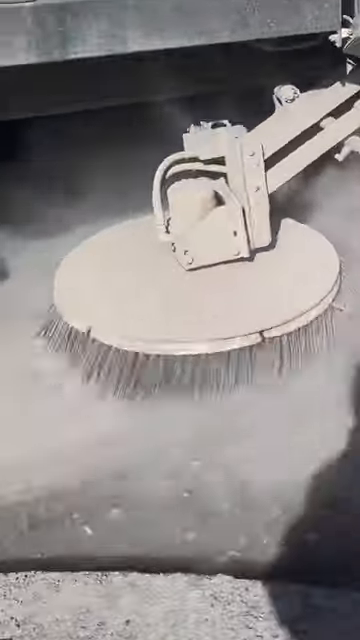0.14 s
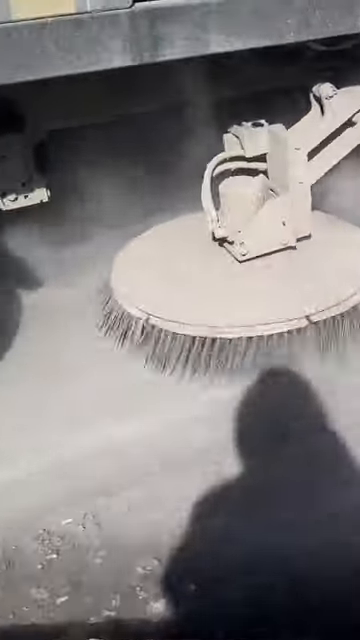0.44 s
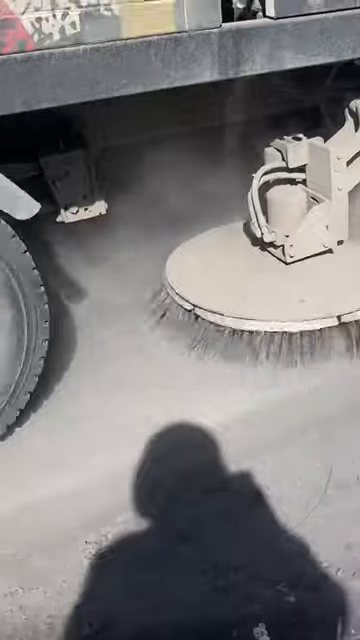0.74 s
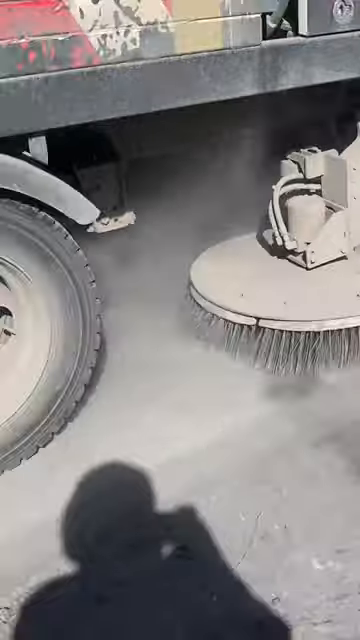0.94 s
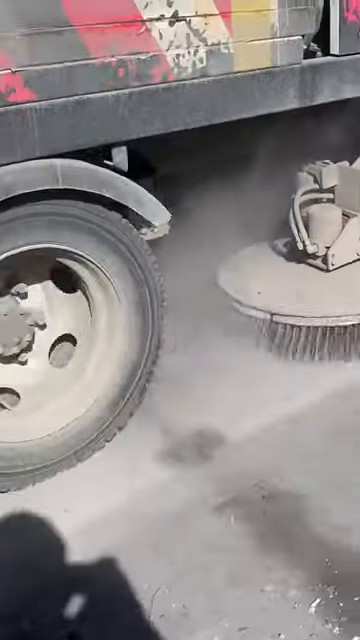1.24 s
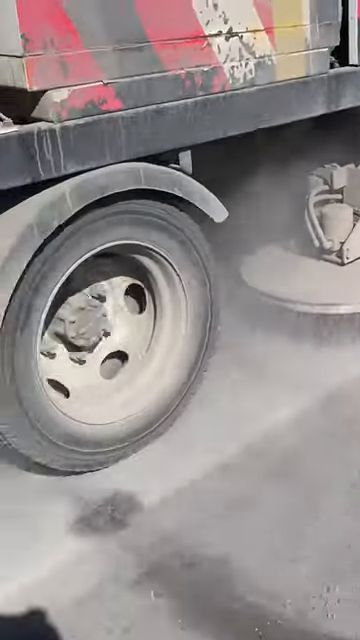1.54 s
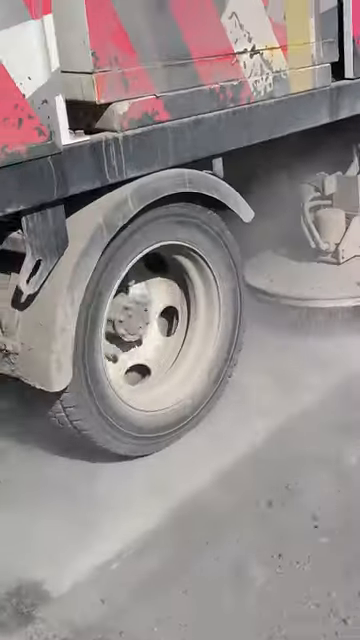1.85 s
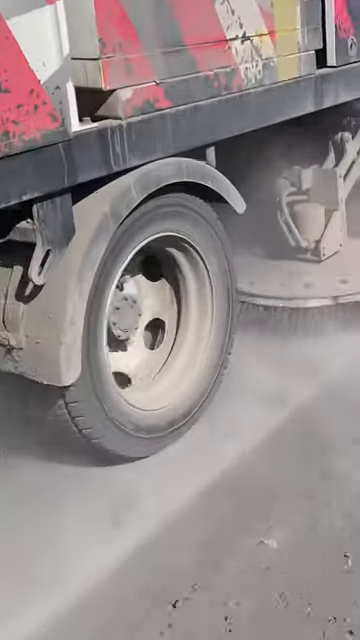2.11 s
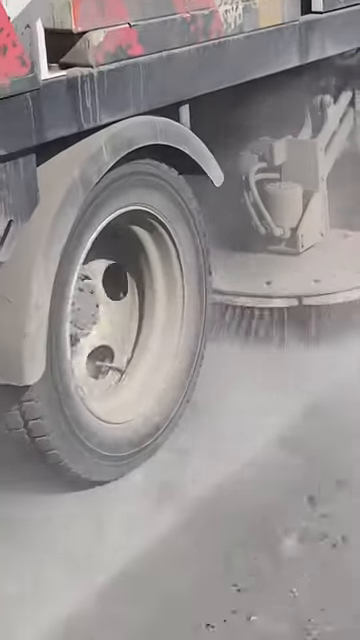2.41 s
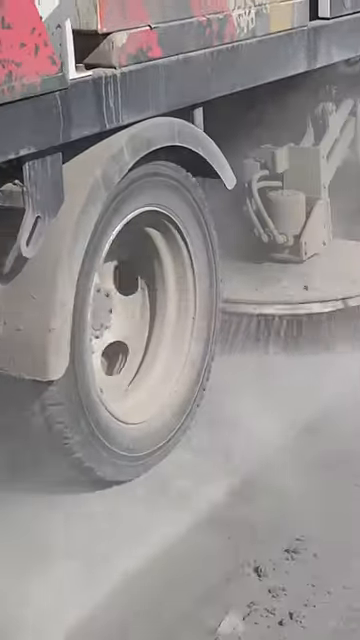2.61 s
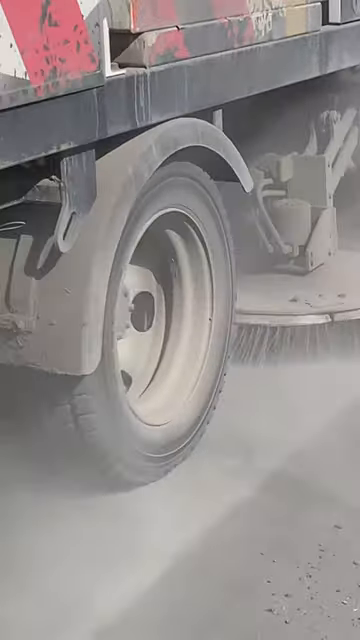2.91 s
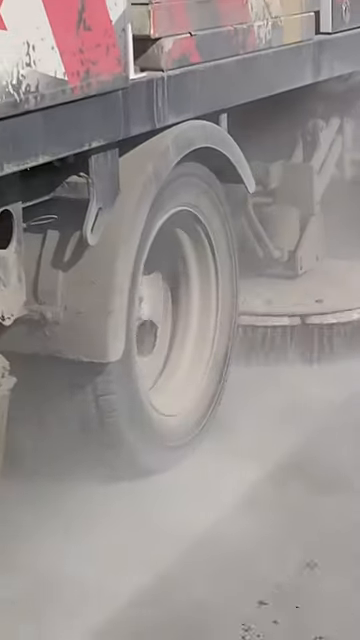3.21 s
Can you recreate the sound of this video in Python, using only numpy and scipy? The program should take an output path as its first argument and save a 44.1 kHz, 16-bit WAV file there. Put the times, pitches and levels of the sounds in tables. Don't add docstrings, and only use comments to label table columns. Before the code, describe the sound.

A street sweeper truck roars steadily, brush rasping on asphalt, bright air hiss slowly fading.

```python
import sys
import numpy as np
from scipy import signal
from scipy.fft import rfft, irfft
from scipy.io import wavfile
from scipy.ndimage import uniform_filter1d

SR = 44100
rng = np.random.default_rng(int(sys.argv[2]) if len(sys.argv) > 2 else 0)


def makeup_ratio(level_db):
    decades = np.asarray(level_db, float) / 20
    return 10 ** decades


def transcribe(u):
    v = np.clip(np.atleast_2d(u).T, -1, 1)
    q = np.round(v * 32767).astype(np.int16)
    wavfile.write(sys.argv[1], SR, q)


N = 148176

# time_s, firing_db, exhaust_ring_db, fourth_order_db
ENGINE_LOAD = [(0.0, -38.5, -64, -50), (0.06, -40, -34, -41), (0.13, -47, -52.5, -39.5),
               (0.39, -36, -40, -37.5), (0.49, -45, -47.5, -49), (0.63, -37, -34, -37),
               (0.8, -38, -40, -61), (1.07, -32, -57, -42), (1.57, -43.5, -48.5, -43.5),
               (1.67, -35.5, -35, -47.5), (1.87, -38.5, -44, -36), (2.1, -39, -43, -49),
               (2.42, -37.5, -50, -30.5), (2.48, -51, -50.5, -34), (2.81, -36.5, -41.5, -46),
               (3.01, -50, -48, -37.5), (3.18, -43.5, -56, -49), (3.36, -52, -64, -68)]
# time_s, level_db
SILENCER_BOOM = [(0.0, -52), (0.31, -49), (0.33, -44), (0.75, -51), (0.94, -53), (0.97, -59), (1.08, -46),
                 (1.1, -50.5), (2.54, -48.5), (2.62, -62), (2.68, -42.5), (3.11, -53), (3.23, -38.5),
                 (3.36, -60)]
# crank_multiple, level_db, wander_hz
STRAY_ORDERS = [
    (2, -55.5, 3),
    (11, -56.5, 3.09),
]
# frequency_hz, level_db_per_hz
RUMBLE_COLOUR = [(15, -41), (25, -15), (59, -1.5), (81, -2.5), (124, -7), (227, -12.5), (373, -34.5),
                 (400, -37), (520, -53), (880, -120)]
# time_s, blade_tone_db, duct_boom_db
BLOWER_LOAD = [(0.0, -41, -50), (0.06, -47.5, -51), (0.22, -56, -43.5), (0.36, -48, -54),
               (0.41, -49.5, -45.5), (0.95, -59, -53), (1.08, -46, -48), (1.23, -55, -58), (1.81, -44, -46),
               (1.9, -52.5, -46), (2.07, -41, -41), (2.14, -52, -50), (2.36, -44.5, -41), (2.53, -68, -41),
               (2.7, -51.5, -57), (2.89, -60, -44.5), (3.1, -51, -48.5), (3.36, -77, -52)]
# pitch_hz, level_db (against the blade tone), wander_hz, share_of_blower_swing (0-1)
BLOWER_TONES = [
    (326.5, -1, 3, 1),
    (656, -7, 1.5, .2),
    (976, -14, 4, .2),
    (468, -8, 2.5, .4),
    (1155, -14, 4, 0),
    (1986, -13, 4, 0),
]
# time_s, level_db
BRUSH_PRESSURE = [
    (0.0, -39),
    (0.08, -38),
    (0.34, -38.5),
    (0.43, -37.5),
    (0.62, -40),
    (1.74, -40),
    (1.76, -41.5),
    (2.08, -40),
    (2.14, -41),
    (3.36, -44.5),
]
# frequency_hz, level_db_per_hz
RASP_COLOUR = [(300, -2.5), (550, 1.5), (1300, -0.5), (2000, 1), (2800, -1), (4500, -2), (6000, -4),
               (8000, -69)]
# frequency_hz, likeness (0-1), left_lead_rad, left_minus_right_db
RASP_PORTS = [(310, 0.9, -1.5, -0.5), (650, 1, 1.44, -3), (1100, 0.43, 1.8, 1), (1427, 0.44, 2.5, -3.5),
              (2310, 0.72, 7, 0.5), (3470, 0.54, 7.5, -1), (4030, 0.9, 7.5, -2), (5580, 0.42, 9, -5),
              (6360, 1, 8, -10), (8000, 0.6, 14, 0)]
# pitch_hz, width_hz, depth (0-1)
RASP_HOLLOWS = [
    (3210, 570, 0.58),
    (5440, 320, 0.48),
]
# time_s, level_db
JET_NEARNESS = [
    (0, -25),
    (.5, -26),
    (1.0, -27.5),
    (1.5, -29),
    (2.0, -29.5),
    (2.6, -30),
    (3.0, -30.5),
    (3.36, -30),
]
# frequency_hz, level_db_per_hz
JET_COLOUR = [(5000, -40), (6500, -17), (8500, -13), (10400, -8.5), (12100, 1.5), (13000, -7),
              (13900, -18.5), (15800, -20.5)]
# frequency_hz, threshold_db
MASKING = [(400, -16), (1000, -7), (2600, -5.5), (5500, -5), (7200, -4), (7800, -8), (8400, -12),
           (9200, -4.5), (10300, -7), (12400, -8), (13000, -6.5), (14300, -3), (15000, -7)]


def rms_one(x):
    return x / np.sqrt(np.mean(x ** 2) + 1e-20)


def in_time(rows):
    s, value = np.transpose(rows)
    return np.interp(np.arange(N) / SR, s, value)


def at_hz(rows, hz, axis=1):
    rows = np.array(rows, float)
    return np.interp(np.log(hz), np.log(rows[:, 0]), rows[:, axis])


def drift(rate_hz):
    r = np.exp(-80 * np.pi * rate_hz / SR)
    noise = rng.standard_normal(N // 40 + 2002)
    slow = signal.lfilter([1], [1, -2 * r, r * r], noise)[2000:]
    return np.interp(np.arange(N) / 40, np.arange(len(slow)), rms_one(slow - slow.mean()))


def two_ports(source, spectrum, alike, lead, pan_db, patchy_db, sway_rad):
    hz = np.maximum(np.fft.rfftfreq(N, 1 / SR), 1)
    low, high = spectrum[0][0], spectrum[-1][0]
    edges = np.minimum(1, hz / low) ** 4 * np.minimum(1, high / hz) ** 12
    colour = makeup_ratio(at_hz(spectrum, hz)) * edges
    likeness = np.clip(alike(hz), 0, 1)
    shared = rfft(rms_one(source))
    own = rfft(rng.standard_normal(N))
    side = np.array([[1], [-1]])
    both = (np.sqrt(1 + likeness) * shared + side * np.sqrt(1 - likeness) * own) * colour
    both = both * np.exp(.5j * side * lead(hz)) * makeup_ratio(.5 * side * pan_db(hz))
    centres = np.geomspace(low, high, 7)
    out = 0
    for k in range(len(centres)):
        weight = np.interp(np.log(hz), np.log(centres), np.arange(len(centres)) == k)
        band = both * weight
        turn = .5 * side * sway_rad * drift(10.0)
        swayed = np.cos(turn) * irfft(band, N) + np.sin(turn) * irfft(1j * band, N)
        flicker_db = patchy_db * (0.14 * drift(4.7) + drift(8.9))
        out = out + swayed * makeup_ratio(flicker_db)
    return rms_one(out)


def wavering(hz, wander_hz, swing_db):
    pitch_hz = hz + wander_hz * drift(4.05)
    phase = 2 * np.pi * np.cumsum(pitch_hz) / SR + rng.uniform(0, 5.74)
    return rms_one(np.sin(phase) * makeup_ratio(swing_db * drift(1.9)))


def body_rumble(firing_db):
    rumble = two_ports(rng.standard_normal(N), RUMBLE_COLOUR, alike=lambda hz: 0.94, lead=lambda hz: -.2,
                       pan_db=lambda hz: .3, patchy_db=1.8, sway_rad=0.2)
    return makeup_ratio(-38.5 + 0.26 * (firing_db - firing_db.mean())) * rumble


def engine():
    crank_hz = 24.0
    load = np.array(ENGINE_LOAD)
    firing_db, ring_db, fourth_db = (in_time(load[:, [0, k]]) for k in range(1, 4))
    tones = sum(makeup_ratio(db) * wavering(order * crank_hz, wander_hz, swing_db=8.5)
                for order, db, wander_hz in STRAY_ORDERS)
    tones = tones + makeup_ratio(firing_db - 0.3) * wavering(3 * crank_hz, 3.16, 0.37)
    tones = tones + makeup_ratio(ring_db - 1.5) * wavering(6 * crank_hz, 3.83, .8)
    tones = tones + makeup_ratio(fourth_db - 2.5) * wavering(4 * crank_hz, 2.46, .8)
    tones = tones + makeup_ratio(in_time(SILENCER_BOOM) - 4.0) * wavering(8 * crank_hz, 6.5, 2.0)
    both = np.array([makeup_ratio(.5) * np.roll(tones, 14), tones])
    return both + body_rumble(firing_db)


def duct_boom(level_db):
    centre_hz, width_hz = 246, 57.7
    limits_hz = [centre_hz - .5 * width_hz, centre_hz + .5 * width_hz]
    duct = signal.butter(2, limits_hz, "band", fs=SR, output="sos")
    return makeup_ratio(level_db - 2) * rms_one(signal.sosfilt(duct, rng.standard_normal(N)))


def blower():
    load = np.array(BLOWER_LOAD)
    blade_db, duct_db = in_time(load[:, [0, 1]]), in_time(load[:, [0, 2]])
    mean_db = blade_db.mean()
    tones = 0
    for hz, db, wander_hz, share in BLOWER_TONES:
        level_db = mean_db + db + share * (blade_db - mean_db)
        swing_db = 9.5 * (1.2 - share)
        tones = tones + makeup_ratio(level_db) * wavering(hz, wander_hz, swing_db)
    tones = tones + duct_boom(duct_db)
    return np.array([np.roll(tones, 4), tones])


def hollowed(rasp):
    ends_s, fade_s = 0.5, 0.18
    near = 1 / (1 + np.exp((np.arange(N) / SR - ends_s) / fade_s))
    shared = rasp.mean(axis=0)
    bands = 0
    for hz, width_hz, depth in RASP_HOLLOWS:
        peak = signal.iirpeak(hz, hz / width_hz, fs=SR)
        bands = bands + np.clip(depth, 0, 1) * signal.lfilter(*peak, shared)
    return rasp - near * bands


def brush():
    bristles_per_s, turns_hz, swing_db = 9000, 2.55, 0.2
    ticks = (rng.random(N) < bristles_per_s / SR) * rng.standard_normal(N)
    ticks = ticks + 0.58 * rng.standard_normal(N)
    rasp = two_ports(ticks, RASP_COLOUR, alike=lambda hz: at_hz(RASP_PORTS, hz, axis=1),
                     lead=lambda hz: at_hz(RASP_PORTS, hz, axis=2),
                     pan_db=lambda hz: at_hz(RASP_PORTS, hz, axis=3), patchy_db=.5, sway_rad=.45)
    turn_db = swing_db * np.sin(2 * np.pi * turns_hz * np.arange(N) / SR + 0.55)
    return makeup_ratio(3 + in_time(BRUSH_PRESSURE) + turn_db) * hollowed(rasp)


def air_jet():
    lag_s, in_phase_hz = -0.0002, 10976
    hiss = two_ports(rng.standard_normal(N), JET_COLOUR, alike=lambda hz: 0.99,
                     lead=lambda hz: 2 * np.pi * lag_s * (hz - in_phase_hz),
                     pan_db=lambda hz: 0, patchy_db=.25, sway_rad=.15)
    return makeup_ratio(in_time(JET_NEARNESS) + 3) * hiss


def scene():
    return engine() + blower() + brush() + air_jet()


def mute_masked(x):
    mid_side = np.array([x[0] + x[1], x[0] - x[1]]) / 2
    hz, _, z = signal.stft(mid_side, SR, "cosine", nperseg=2048)
    power = np.abs(z[:, :1024]) ** 2
    narrow = power.reshape(2, 256, 4, -1).mean(axis=2).repeat(4, axis=1)
    whole_frame = power.sum(axis=0).mean(axis=0)
    around = uniform_filter1d(power + .5 * power[::-1], size=40, axis=1)
    around = around + makeup_ratio(-21) ** 2 * whole_frame
    threshold = makeup_ratio(at_hz(MASKING, np.maximum(hz[:1024], 1))) ** 2
    z[:, :1024] *= narrow > threshold[:, None] * around
    mid, side = signal.istft(z, SR, "cosine", nperseg=2048)[1][:, :N]
    return np.array([mid + side, mid - side])


def top_cut(x):
    return signal.sosfilt(signal.butter(12, 15760, fs=SR, output="sos"), x)


def record(dry):
    bass_cut = signal.butter(2, 42, "high", fs=SR, output="sos")
    mix = mute_masked(signal.sosfilt(bass_cut, dry))
    return top_cut(mix)


dry = scene()
out = record(dry)
transcribe(out)
```